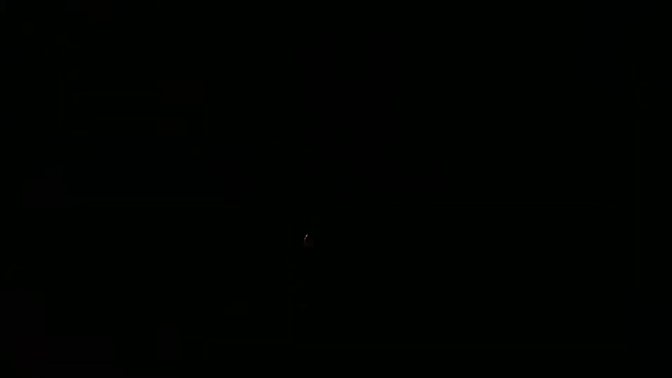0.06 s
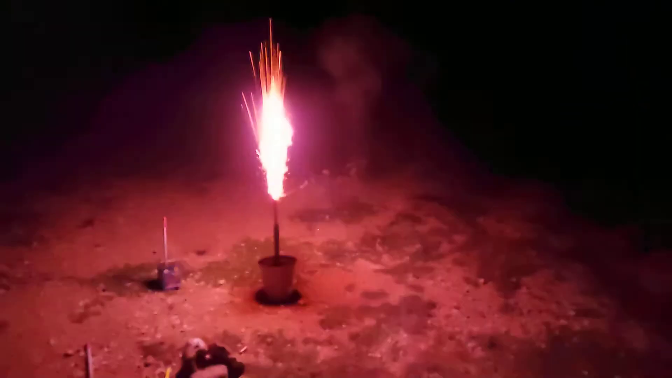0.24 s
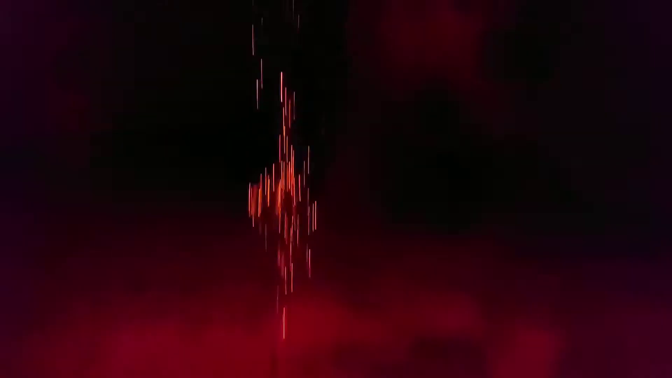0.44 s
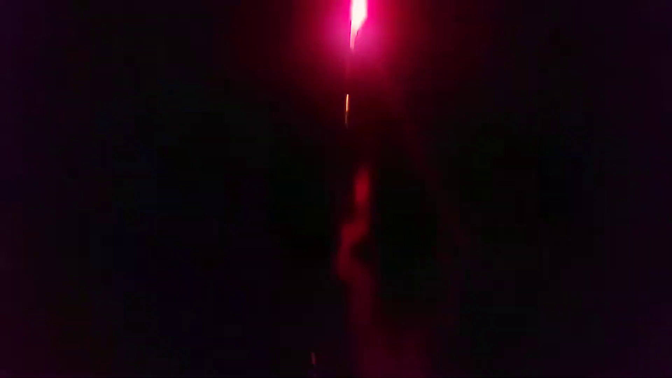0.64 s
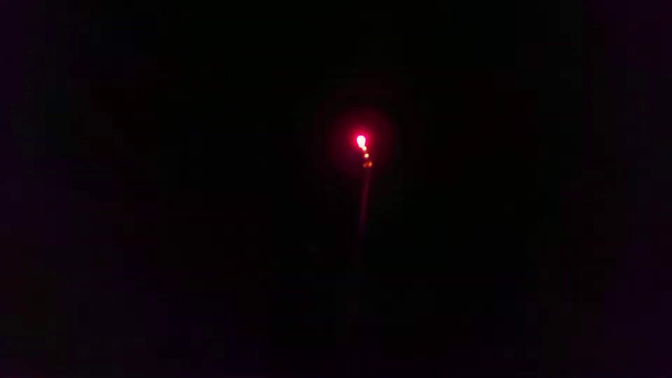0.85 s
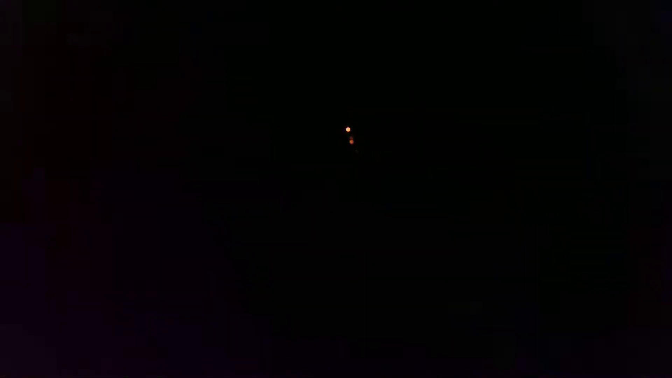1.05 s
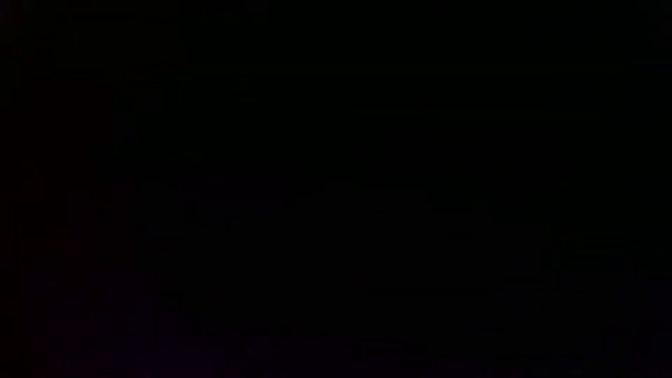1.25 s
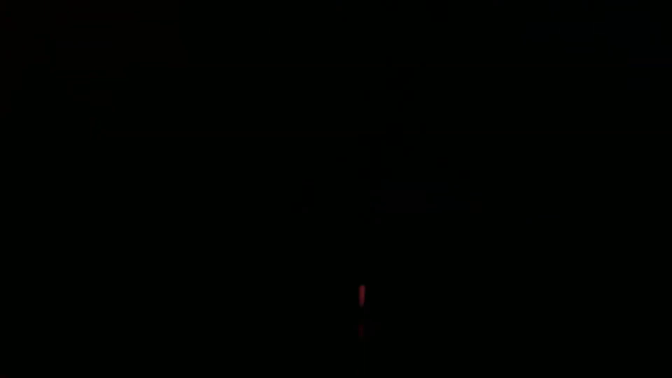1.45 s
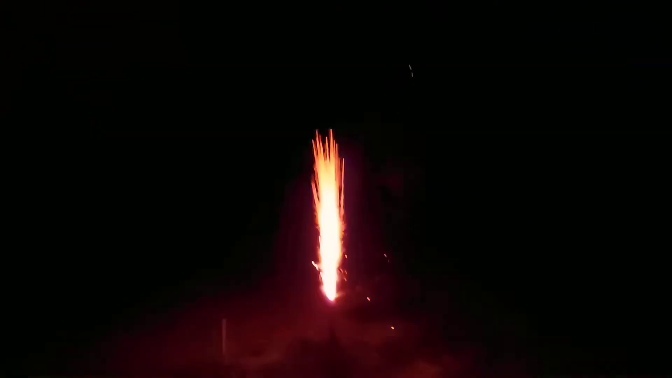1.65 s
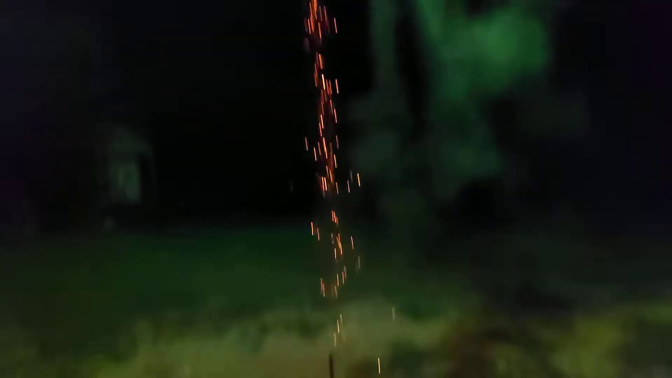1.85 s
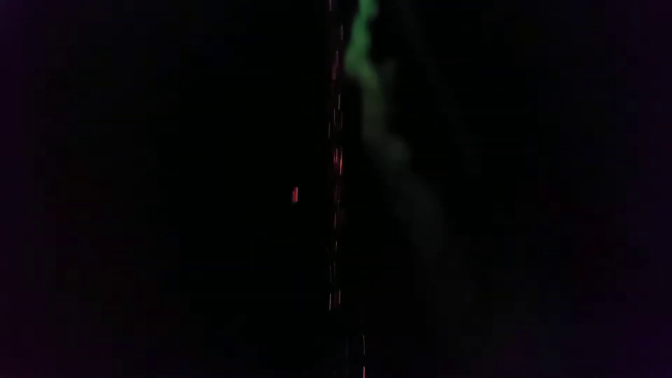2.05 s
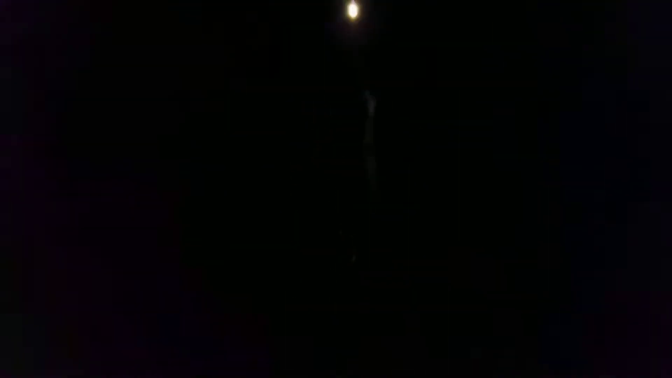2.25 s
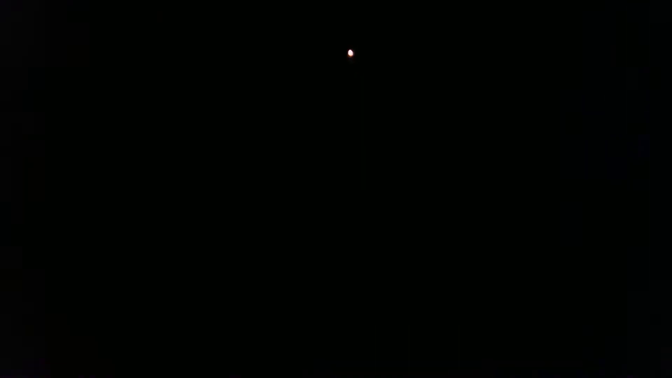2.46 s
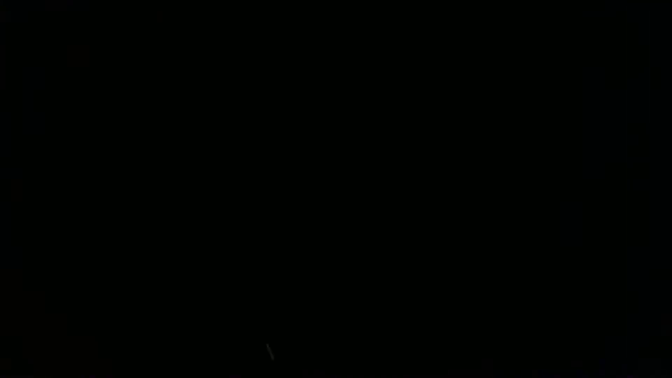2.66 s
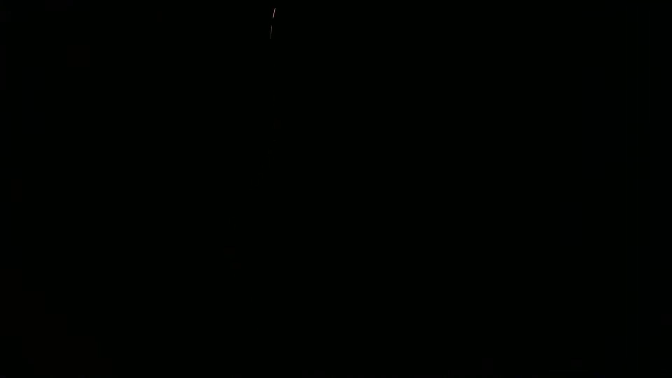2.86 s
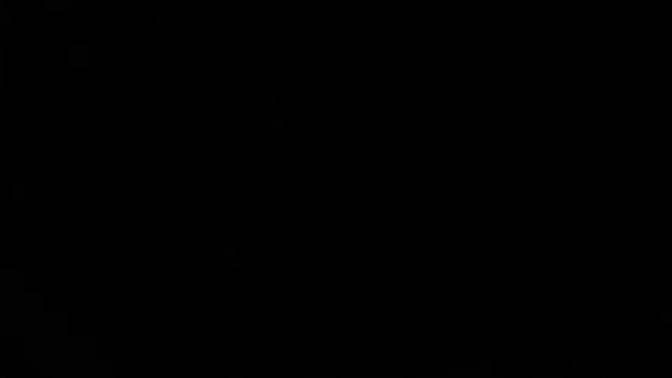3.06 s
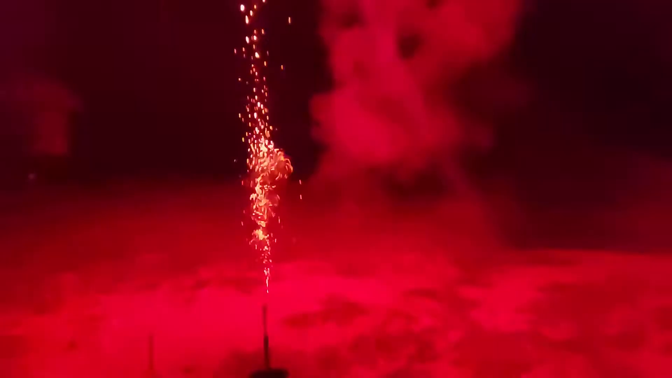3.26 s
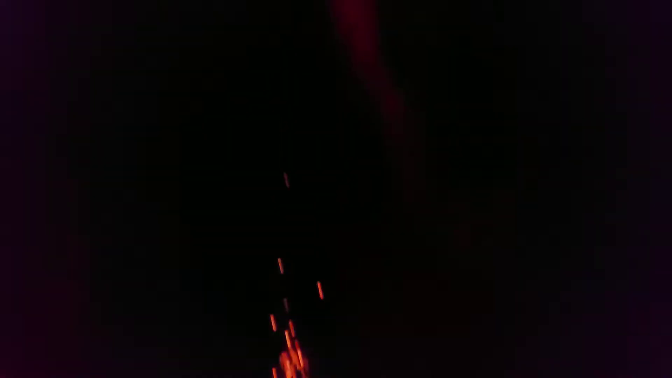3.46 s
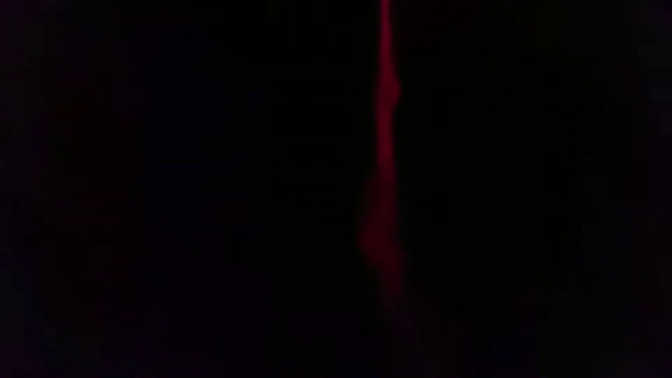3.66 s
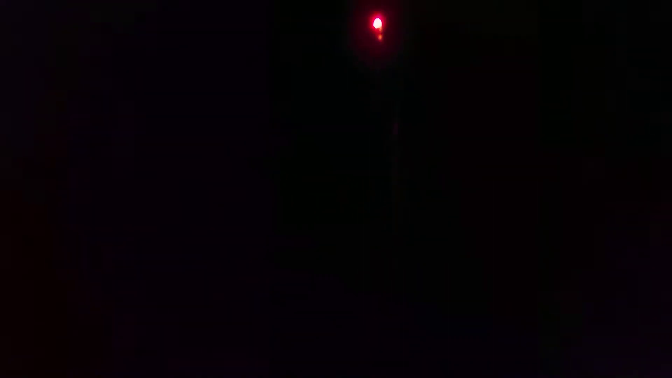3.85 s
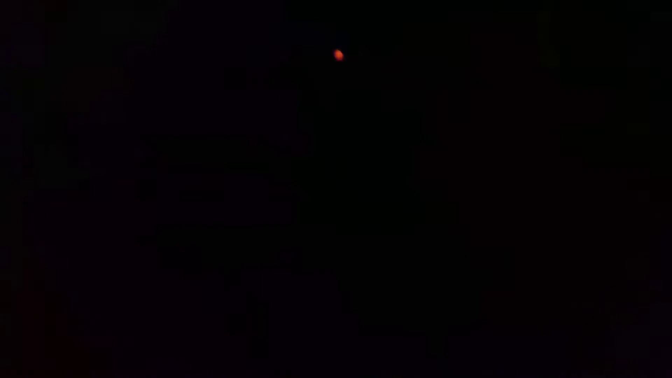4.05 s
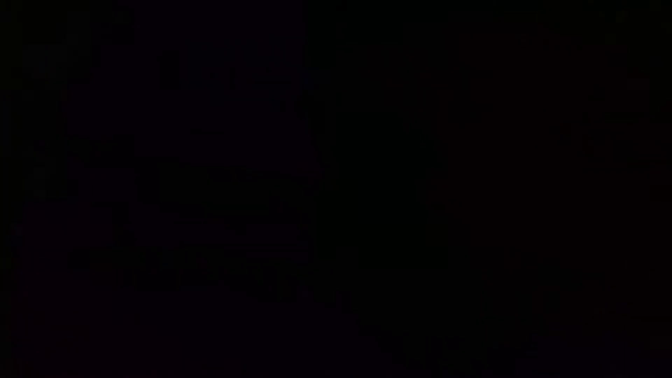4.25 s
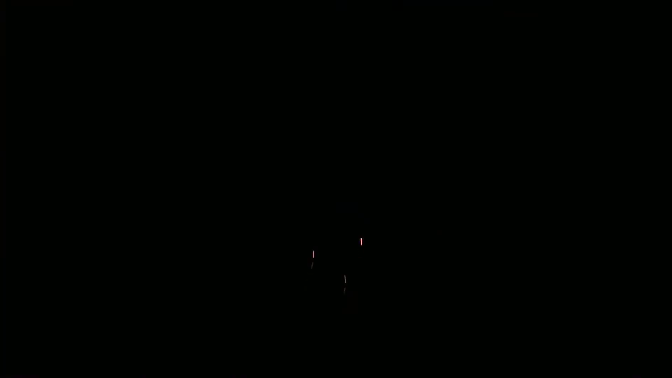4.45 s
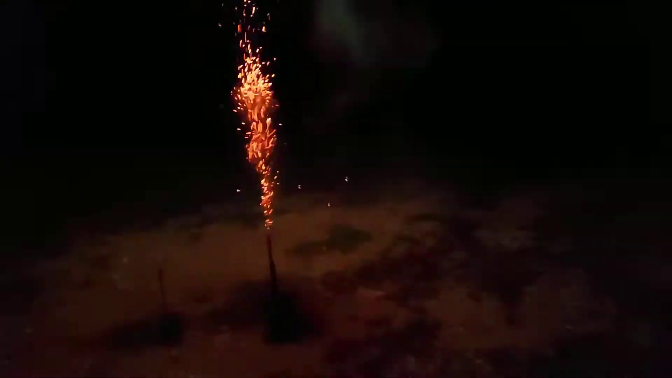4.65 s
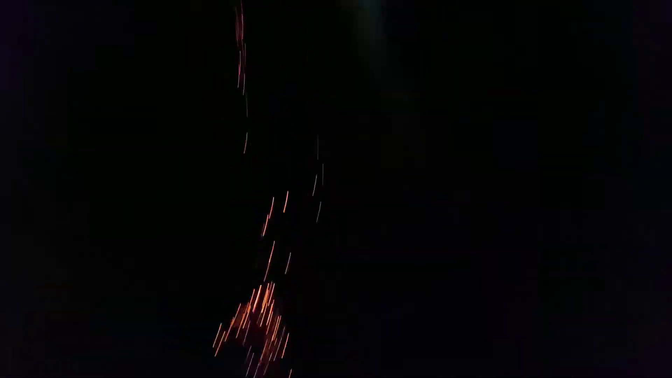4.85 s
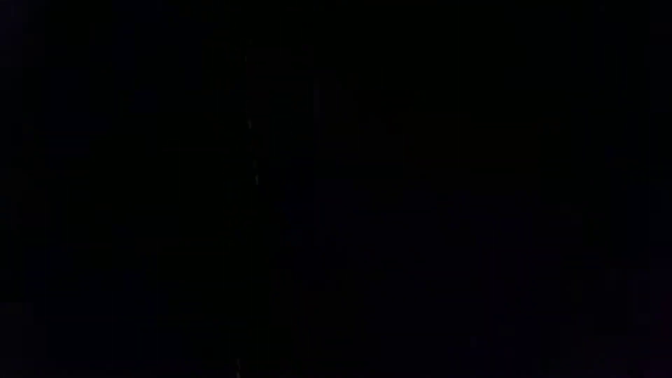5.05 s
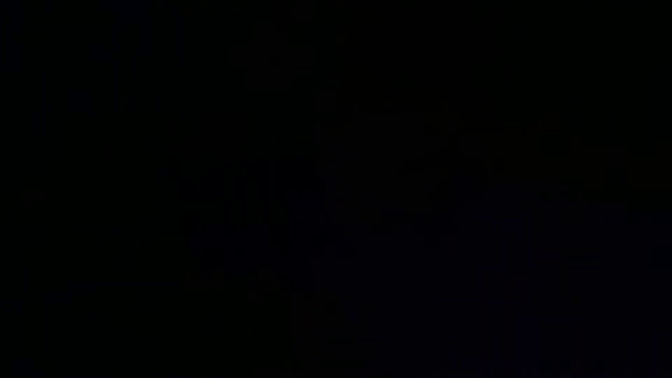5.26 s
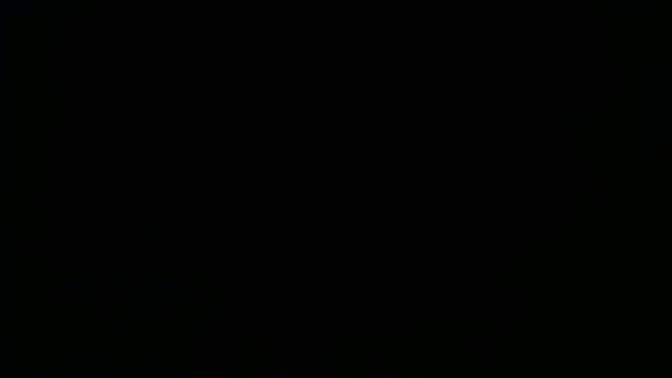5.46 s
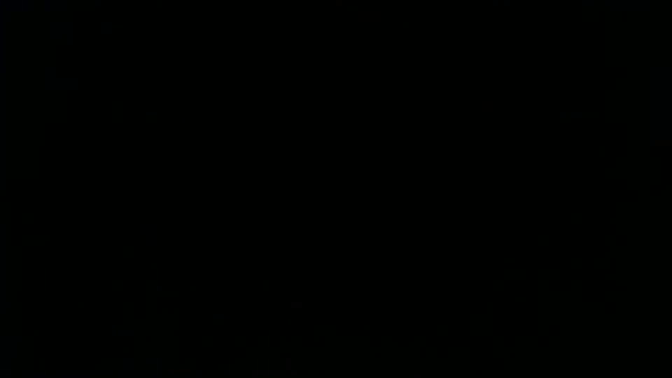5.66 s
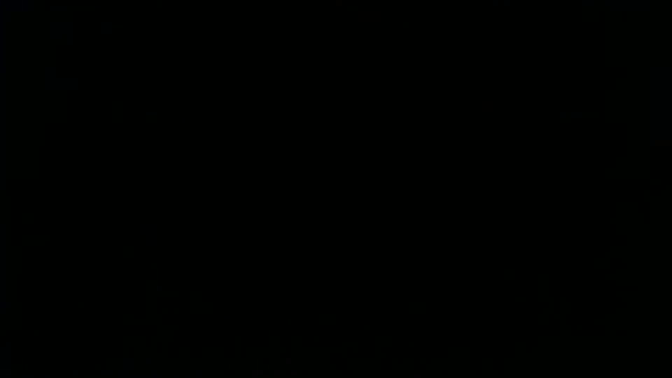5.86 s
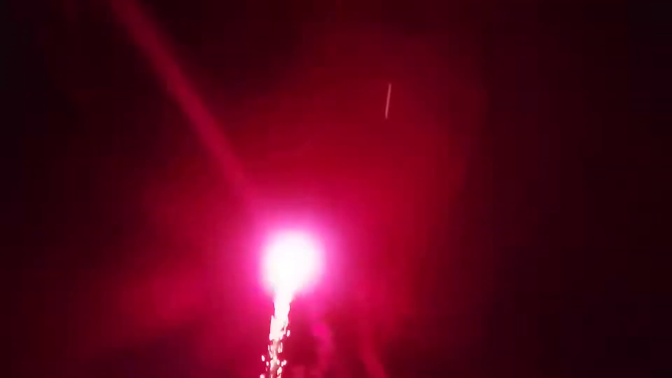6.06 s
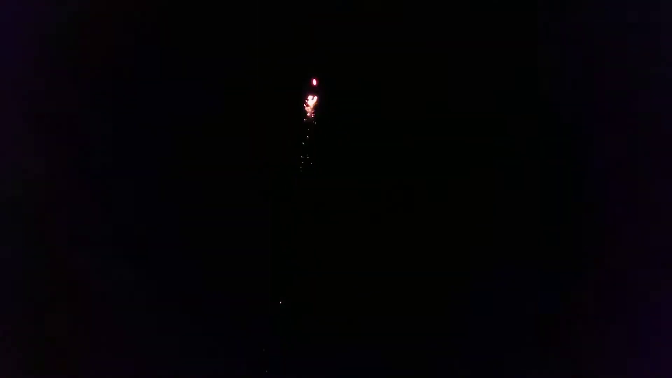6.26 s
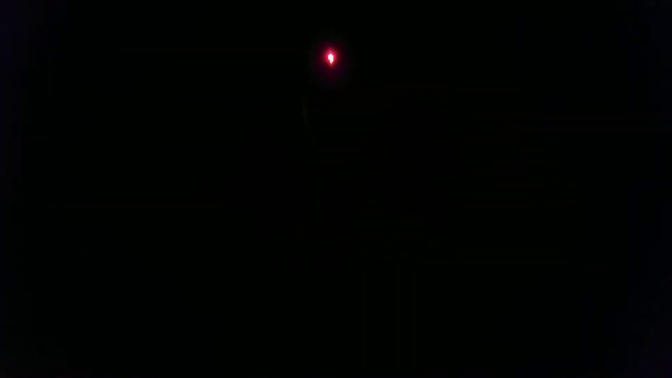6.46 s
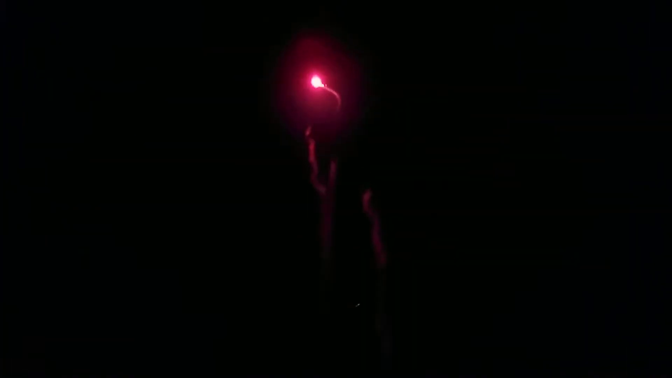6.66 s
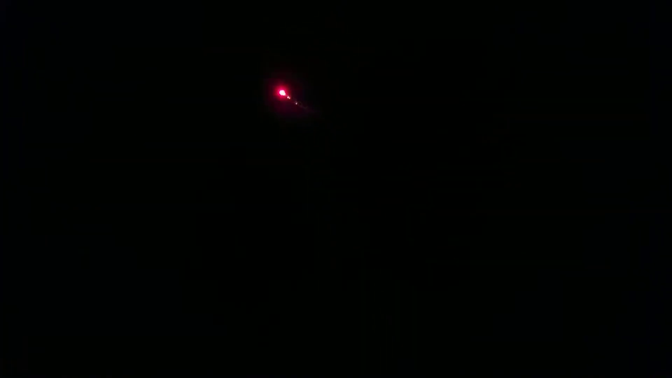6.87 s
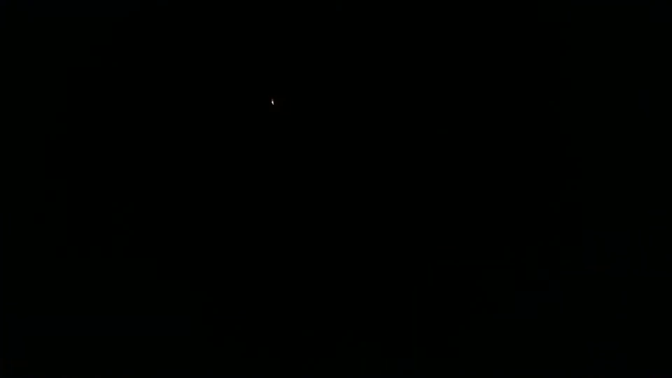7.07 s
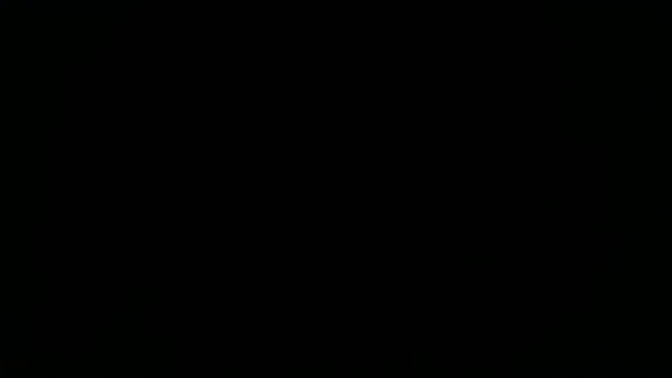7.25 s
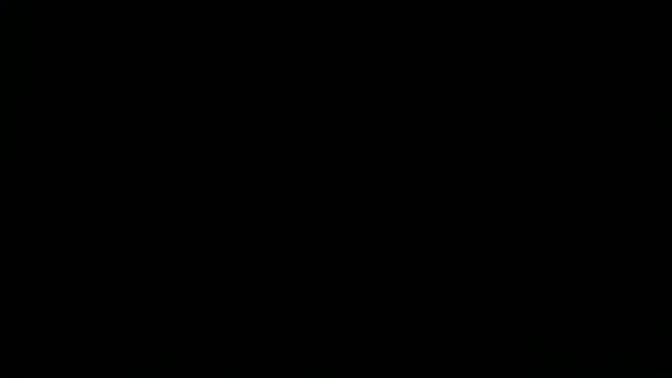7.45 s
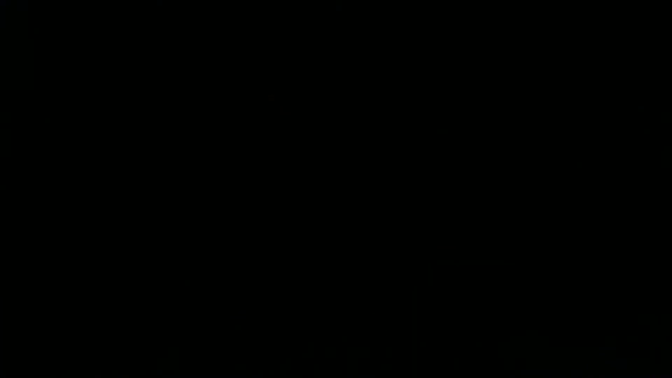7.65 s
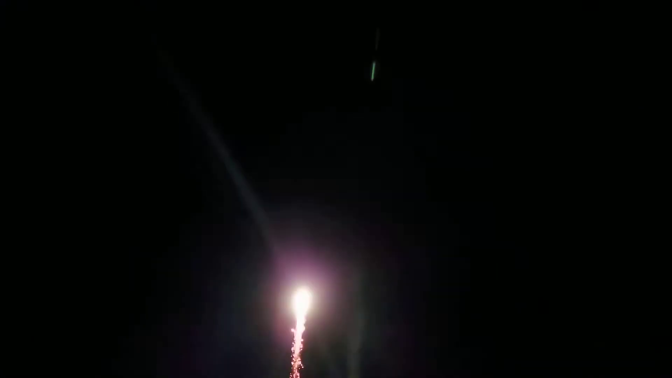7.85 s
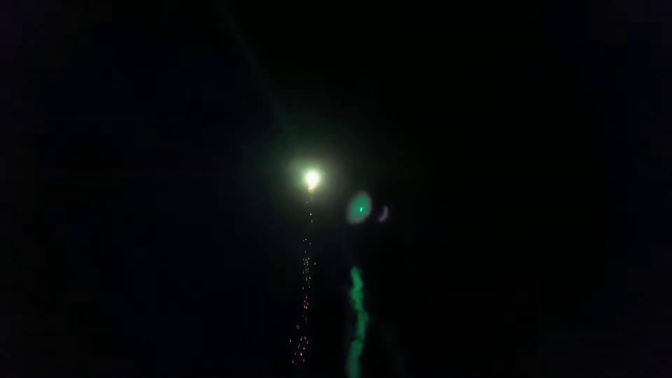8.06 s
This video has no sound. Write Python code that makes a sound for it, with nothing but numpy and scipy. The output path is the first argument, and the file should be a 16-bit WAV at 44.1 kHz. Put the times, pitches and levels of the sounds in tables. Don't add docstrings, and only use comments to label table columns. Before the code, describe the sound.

A quiet night outdoors, heard through a hand-held stereo microphone a few metres from a firework candle. Dense insect trilling around 3 kHz, with a higher shimmer above, runs throughout, swelling gently; a close cricket adds short high phrases. A very faint rising hum precedes the first dull, hollow pop at 0.2 s. Its star hisses away, flaring near 0.55 s. A louder, brighter shot cracks at 1.6, then weaker-jetted ones at 3.1 and 4.5, the latter with a brief rough whirr. Sharp shots follow at 5.9 and 7.7. Each lasts only a few hundredths of a second, followed by a soft half-second tail from trees, a muffled wall echo and a hiss thinning within a second. Low, often one-sided air thumps stand out around 0.5, 1.45, 2.8 and 4.2 s, then become weaker. A distant frog trills barely audibly near 1.3, 4 and 6.6 s. Insects continue to the end at 8.1 s.

```python
import sys
import numpy as np
from scipy import signal
from scipy.fft import rfft, irfft, next_fast_len
from scipy.io import wavfile
from scipy.ndimage import uniform_filter1d

SR = 44100
rng = np.random.default_rng(int(sys.argv[2]) if len(sys.argv) > 2 else 0)


def wav_out(sig):
    wavfile.write(sys.argv[1], SR, np.round(np.clip(np.atleast_2d(sig).T, -1, 1) * 32767).astype(np.int16))


def boost(x):
    u = np.asarray(x, float) / 20
    return 10 ** u


N = 357651

# t/s, delay until the star leaves the mouth/ms
FIRING = [
    (.181, 4.8),
    (1.5998, 5.5),
    (3.1323, 5.1),
    (4.5137, 5.5),
    (5.9229, 5.3),
    (7.6647, 6.8),
]


def candle():
    # jet level/dB, tube ring level/dB, jet brightness/dB, push level/dB, crack level/dB
    shots = [
        (1.5, -13, -26, -20, -16.5),
        (4.5, -14.5, -15, -18, -2),
        (-2.5, -23.5, -26, -20, -9.5),
        (-2, -22, -19.5, -18, -9),
        (0, -18, -23, -17.5, -1.5),
        (1.5, -26.5, -20.5, -16.5, -2.5),
    ]
    trees_db = [-30.5, -31, -31, -29.5, -29, -29.5]
    sizzle_db = [6.5, 1.5, 16.5, 3, 4, -4]
    # f/Hz, level/dB per Hz
    hiss_spectrum = [(500, -34.5), (1000, -5.5), (2000, -8), (4000, -1), (7000, -1), (10000, -6.5),
                     (12500, -1), (16000, -8.5)]
    out = np.zeros((2, N))
    for (start, exit_ms), shot, tail_db, bright_top_db in zip(FIRING, shots, trees_db, sizzle_db):
        add(out, blast(exit_ms, *shot, bright_top_db), start - .012)
        add(out, trees(tail_db), start)
    hiss = diffuse(hiss_spectrum, [(100, .2), (15000, 0)], N)
    return out + star_level() * boost(8.5 + 0.74 * drift(40)) * hiss


def blast(exit_ms, jet_db, tube_db, bright_db, push_db, crack_db, sizzle_db):
    # t/ms after ignition, width/ms, pressure share
    pulses = [
        (0, .5, .9),
        (2.2, 1.1, -1.1),
        (10.6, 1.0, .9),
        (12.5, 2.4, .45),
        (17.5, 1.6, -.25),
    ]
    # f/Hz, level/dB per Hz
    jet_spectrum = [(120, -40.5), (200, -7.5), (541, -4), (811, -12.5), (1460, -8), (1930, -11.5),
                    (2940, -8), (4410, -12.5), (8400, -19), (10100, -22), (13600, -21.5), (15400, -27.5),
                    (16300, -38)]
    # f/Hz, level/dB, decay time T60/s
    modes = [
        (565, 0, .017),
        (1040, -8, .012),
        (1600, -10, .01),
    ]
    wall_s, wall_db, wall_cut_hz = .147, -20.5, 270
    port_lag_s = 4e-5
    ms = np.arange(SR // 4) / SR * 1000 - 12
    push = sum(share * np.exp(-.5 * ((ms - at) / width) ** 2) for at, width, share in pulses)

    shape_ms = [-12, -9, -3, -1.2, -.2, exit_ms + 2, exit_ms + 6, exit_ms + 20, 250]
    shape = boost(np.interp(ms, shape_ms, [-60, -30, -24, -14, 0, -1, -13, -28, -300]))
    ragged = boost(2.5 * 3.9 * uniform_filter1d(rng.standard_normal(len(ms)), size=16))
    tilt = []
    for hz, db in jet_spectrum:
        db = db + (bright_db + 23.0) * np.clip(np.log2(hz / 3000) / 2, 0, 1)
        db = db + sizzle_db * (hz > 11000) + (tube_db - jet_db + 20.0) * (hz < 900)
        tilt.append((hz, db))
    turbulence = colour(ragged * rng.standard_normal((2, len(ms))), tilt)
    jet, stray = boost(jet_db - 14) * shape * turbulence

    # t/ms, crack share, ring share
    cracks = [(0, .35, -.2), (exit_ms, .95, .7), (exit_ms + 1.9, .85, .6)]
    crack = sum(share * np.exp(-.5 * ((ms - at) / .07) ** 2) for at, share, _ in cracks)
    kick = sum(share * (np.arange(len(ms)) == round((at + 11.6) * SR / 1000)) for at, _, share in cracks)
    tube = sum(boost(tube_db + 4.5 + db) * ring(kick, hz, t60) for hz, db, t60 in modes)
    direct = boost(push_db) * push + jet + tube + boost(crack_db) * crack

    dull = signal.sosfilt(signal.butter(3, wall_cut_hz, fs=SR, output="sos"), direct - 0.95 * tube)
    mono = direct + boost(wall_db) * np.interp(ms - 1000 * wall_s, ms, dull, left=0)

    hz = np.arange(len(ms) // 2 + 1) * SR / len(ms)
    shaded = np.exp(-2j * np.pi * hz * port_lag_s) * boost(-5 * (hz / 12000) ** 2)
    scatter = signal.sosfilt(signal.butter(2, 7000, "high", fs=SR, output="sos"), stray)
    return np.array([mono, irfft(rfft(mono) * shaded, len(ms))]) + .5 * scatter


def trees(tail_db):
    # f/Hz, level/dB per Hz
    tail_spectrum = [(24, -48), (40, -14), (130, -10), (646, -9.5), (965, -12), (1630, -11), (3220, -15.5),
                     (3470, -14.5), (11800, -13), (16000, -19)]
    # f/Hz, T60/s
    decay = [(60, 0.4), (300, 0.53), (1000, 0.43), (3000, 0.54), (8000, 0.3502), (15000, 0.49)]
    # f/Hz, left-right likeness
    likeness = [(60, 0.91), (180, 0.68), (550, 0.66), (1650, -0.15), (4970, 0.042), (15000, -0.6)]
    t, hz = np.arange(SR) / SR, np.arange(SR // 2 + 1) + 1.
    noise = rfft(diffuse(tail_spectrum, likeness, SR))
    out, centres = 0, np.geomspace(30, 18000, 10)
    for centre, only in zip(centres, np.eye(len(centres))):
        band = irfft(noise * at_hz(np.transpose([centres, only]), hz), SR)
        t60 = at_hz(decay, centre)
        swell = (0.09 + t / 0.068) ** 1.275 * boost(-60 * t / t60 * 1.417)
        swell = swell + boost(-13.0 - 60 * t / (1.3 * t60))
        out = out + band * swell * boost(2.4 * drift(25)[:SR])
    return boost(tail_db) * out * np.minimum(t / 0.0043, 1)


def star_level():
    # hiss level/dB at ignition, fade/dB per s, burning time/s
    stars = [
        (-65.5, 16.5, 0.77),
        (-66, 13, 0.78),
        (-61.5, 31.5, 0.836),
        (-67.5, 26.5, 0.71),
        (-61.5, 38, 0.59),
        (-69, 24, 0.64),
    ]
    # t/s, level/dB, half length/s
    flares = [
        (0.552, -64, 0.061),
        (2.752, -83.5, 0.17),
        (4.3, -82, 0.12),
        (6.192, -65.5, .03),
        (6.738, -78.5, 0.14),
        (7.402, -86, 0.0069),
    ]
    burn_out_db_per_s, ember_db = 101, -90
    t, power = np.arange(N) / SR, boost(2 * ember_db)
    for (start, _), (db, fade, burns) in zip(FIRING, stars):
        age = t - start
        level = db - fade * age - burn_out_db_per_s * np.maximum(age - burns, 0)
        power = power + (age > 0) * boost(2 * level)
    return np.sqrt(power + sum(boost(2 * db) * np.exp(-((t - s) / half) ** 2) for s, db, half in flares))


def sputter():
    # t/s, f/Hz, level/dB, half length/s
    whirrs = [
        (4.617, 2200, -44, 0.018),
    ]
    t = np.arange(N) / SR
    noise = rng.standard_normal((2, N))
    out = 0
    for s, hz, db, half in whirrs:
        whirr = rms_one(ring(ring(noise, hz, 0.0048), hz, 0.0048))
        out = out + boost(db) * np.exp(-.5 * ((t - s) / half) ** 2) * whirr
    return out


def hum():
    # t/s, f/Hz, level/dB
    tone = [
        (0, 240, -65.5),
        (.07, 288.2, -73),
        (.15, 340, -75.5),
        (.17, 349.8, -73),
    ]
    hz, db = in_time(tone)
    after = np.arange(N) > tone[-1][0] * SR
    return boost(db + 9.5 - 100 * after) * np.sin(2 * np.pi * np.cumsum(hz) / SR)


def insects():
    # f/Hz, spread/Hz, pulse rate/Hz, noise share 0-1, left-right likeness, level/dB
    choirs = [
        (2858, 95, 71, 0.5, -0.2, 1.0),
        (3478, 120, 67, 0.2, -0.21, 2.5),
        (6350, 180, 70, 1, 0.071, 1.5),
    ]
    soloist = (6510, 49, 35, 0.2, .2, .12)
    choir_db = [-56.5, -56.5, -63.5]
    # t/s, level/dB
    eagerness = [(0, 2), (.4, 1), (1, -1), (1.5, 1.5), (2.3, -1.5), (3, 2.5), (3.7, -2.5), (4.4, 0.7),
                 (5.2, -4), (6, -2), (7, -2), (8.11, 1.4)]
    # t/s, length/s, level/dB
    phrases = [(.05, .1, -63.5), (.5, 0.17, -64), (.82, 0.14, -59), (1.0, 0.069, -65), (1.155, 0.2, -62),
               (1.49, 0.085, -61), (1.9, 0.16, -62.5), (2.25, .15, -60), (2.61, 0.27, -69.5),
               (2.92, 0.33, -64.5), (3.48, 0.22, -66.5), (3.86, 0.11, -66.5), (3.965, 0.091, -61.5),
               (4.17, 0.24, -67), (4.9, .16, -64.5), (5.17, .19, -64), (5.5, .2, -66), (5.81, 0.094, -60.5),
               (6.185, 0.17, -64.5), (6.36, 0.098, -72), (6.6, .17, -61), (6.85, 0.28, -74),
               (7.13, 0.11, -64.5), (7.24, 0.31, -61.5), (7.93, .2, -61)]
    rise_s, fall_s, between_db = 0.016, 0.013, -82
    wander_db, answer_db = 0.54, 1.5
    swell_db, = in_time(eagerness)
    singing, phrase = 0, boost(between_db)
    for s, length, db in phrases:
        gate = held(s, length, rise_s, fall_s)
        singing = singing + gate
        phrase = phrase + boost(db) * gate
    low, middle, high = (boost(db + swell_db + wander_db * drift(4.2)) * choir(*kind, count=5)
                         for db, kind in zip(choir_db, choirs))
    answer = boost(answer_db * (2 * uniform_filter1d(singing, size=3000) - 1))
    return low + middle + answer * high + phrase * choir(*soloist, count=1)


def choir(hz, spread_hz, per_s, noisy, alike, trim_db, count=6):
    near = 0
    for detune, tempo, start, turn in rng.standard_normal((count, 4)):
        beat = 2 * np.pi * np.cumsum(per_s * (1 + .12 * tempo + 0.016 * drift(3))) / SR + 9 * start
        phase = 2 * np.pi * np.cumsum(hz + spread_hz * (.7 * detune + 0.36 * drift(9.7))) / SR
        apart = np.arccos(np.clip(alike, -1, 1)) * np.sign(turn) + 0.16 * turn
        pulse = np.maximum(np.sin(beat) + 0.1, 0) * boost(1.3 * drift(3.6))
        near = near + pulse * np.sin([phase, phase + apart])
    far = diffuse([(100, 0), (20000, 0)], [(100, alike), (20000, alike)], N)
    for t60 in np.array([.9, 1, 1.1]) / spread_hz:
        far = ring(far, hz, t60)
    noisy = np.clip(noisy, 0, 1)
    return boost(trim_db) * (np.sqrt(1 - noisy) * rms_one(near) + np.sqrt(noisy) * rms_one(far))


def frog():
    # t/s, length/s, f/Hz, level/dB
    croaks = [
        (1.3, .3, 1344, -77.5),
        (3.99, 0.35, 1280, -82),
        (6.6, 0.28, 1270, -82.5),
    ]
    pulses_per_s, duty = 52.2, .6
    sweep, blur_share, t60_s = .1, .55, .008
    upper_hz, upper_db = 2365, 3
    cycle = (pulses_per_s * np.arange(N) / SR + .03 * drift(8)) % 1
    within = np.clip(cycle / duty, 0, 1)
    pulse = np.sin(np.pi * within) * boost(1.4 * drift(30))
    glide = 2 * np.pi * np.cumsum(1 + sweep * (2 * within - 1) * (within < 1)) / SR
    leaves = rng.standard_normal((2, N))

    def band(hz):
        blur = rms_one(ring(ring(leaves, hz, t60_s), hz, t60_s))
        return pulse * np.sin(hz * glide + [[0], [1]]) + blur_share * blur * (pulse + .5)

    upper = boost(upper_db) * band(upper_hz)
    return sum(boost(db + 5.5) * held(s, length, 0.082, .07) * (upper + band(hz)) for s, length, hz, db in croaks)


def wind():
    # t/s, peak level/dB, left-right difference/dB, half length/s
    gusts = [(0.141, -54.5, -5, 0.031), (0.288, -44, 2, 0.09), (.435, -38.5, -1, .06),
             (0.513, -32, -21, 0.027), (0.567, -39, -21.5, .04), (0.712, -52.5, 0, 0.044),
             (.9, -50, -1.5, .04), (0.965, -50.5, -2, 0.06), (1.444, -25.5, -16, 0.019),
             (1.536, -45.5, -12, 0.047), (1.88, -57, -12.5, 0.12), (2.691, -53.5, -17.5, 0.037),
             (2.778, -34, -4.5, 0.02), (2.832, -47, -15, 0.085), (3.359, -45.5, -18, 0.037),
             (3.665, -64, -12, .04), (4.18, -42, -11, 0.029), (4.214, -29.5, -19, 0.021),
             (4.271, -39, -1, 0.031), (4.399, -47, -8, 0.11), (4.759, -42.5, -11, 0.035),
             (4.836, -48, -28, 0.019), (4.878, -47.5, -12, 0.038), (5.263, -79, 5, 0.027),
             (5.797, -66, -4, .08), (6.498, -59.5, -5, 0.035), (6.715, -58.5, -4, .05),
             (6.92, -66, -1, 0.078), (7.405, -63, .7, .04), (7.86, -54, -4, 0.044)]
    # t/s, level/dB over its mean
    breeze = [(0, 6), (1.2, 4), (2.3, 4), (3.4, 13), (3.8, -15), (4.9, 10), (5.3, -21.5), (6.2, 12.5),
              (6.4, -5), (7.3, -2), (8.11, 2.5)]
    # f/Hz, level/dB per Hz
    spectrum = [(15, -38), (30, -11), (60, -5.5), (120, -2), (230, -16.5), (400, -34.5), (600, -52.5),
                (1000, -80), (2000, -110)]
    gust_drop_db, breeze_db, wander_db = 12, -75, 3
    edge_hz, edge_db, edge_per_lean = 170, -7, .45
    t = np.arange(N) / SR
    power = boost(2 * (breeze_db + in_time(breeze)[0] + wander_db * drift(7.6)))
    leaning = -3 * power
    for s, db, pan_db, half in gusts:
        gust = boost(2 * (db - gust_drop_db * np.abs(t - s) / half))
        power, leaning = power + gust, leaning + pan_db * gust
    shared, *own = rng.standard_normal((3, N))
    air = colour(1.6 * shared + np.array(own), spectrum)
    air = air / (uniform_filter1d(air ** 2, size=1500) + .05) ** 0.7
    edge = signal.sosfilt(signal.butter(2, edge_hz, "high", fs=SR, output="sos"), air)
    air = air + (boost(edge_db + edge_per_lean * np.abs(leaning / power)) - 1) * edge
    left_share = 1 / (1 + boost(-leaning / power))
    return boost(-0.5) * np.sqrt(power) * 2 * np.array([left_share, 1 - left_share]) * air


def night():
    # f/Hz, level/dB per Hz
    spectrum = [(18, -43), (30, -11), (130, -8), (210, -15.5), (760, -25.5), (2150, -32), (2500, -16),
                (3950, -21.5), (4250, -39.5), (5100, -35), (5700, -17.5), (7000, -27), (7700, -36),
                (8600, -26.5), (10000, -40.5)]
    # f/Hz, left-right likeness
    likeness = [(60, 0.44), (240, 0.85), (950, -0.59), (3770, 0.51), (15000, -0.12)]
    return boost(-69) * diffuse(spectrum, likeness, N)


def rms_one(x):
    return x / np.sqrt(np.mean(x ** 2) + 1e-20)


def in_time(rows):
    s, *columns = np.transpose(np.vstack(rows))
    return [np.interp(np.arange(N) / SR, s, c) for c in columns]


def at_hz(points, hz):
    return np.interp(np.log(hz), np.log(np.array(points)[:, 0]), np.array(points)[:, 1])


def drift(rate):
    r = np.exp(-40 * np.pi * rate / SR)
    slow = signal.lfilter([1], [1, -2 * r, r * r], rng.standard_normal(N // 20 + 4002))[4000:]
    return np.interp(np.arange(N) / 20, np.arange(len(slow)), rms_one(slow))


def ring(x, hz, t60):
    r, w = boost(-60 / (t60 * SR)), 2 * np.pi * hz / SR
    return signal.lfilter([0, np.sin(w)], [1, -2 * r * np.cos(w), r * r], x + 1e-18)


def colour(white, spectrum):
    length = white.shape[-1]
    size = next_fast_len(length)
    hz = np.arange(size // 2 + 1) * SR / size + 1
    return rms_one(irfft(rfft(white, size) * boost(at_hz(spectrum, hz)), size)[..., :length])


def diffuse(spectrum, likeness, length):
    alike = np.clip(np.array(likeness)[:, 1], -.98, .98)
    parts = []
    for sign in (1, -1):
        share = [(hz, 10 * np.log10(1 + sign * c)) for (hz, _), c in zip(likeness, alike)]
        gain = boost(np.mean(at_hz(share, np.geomspace(2e3, 2e4, 30))))
        parts.append(colour(rng.standard_normal(length), share) * gain)
    mid, side = parts
    return colour(np.array([mid + side, mid - side]), spectrum)


def held(s, length, rise, fall):
    t = np.arange(N) / SR - s
    return np.clip(t / rise, 0, 1) * np.exp(-np.maximum(t - length, 0) / fall)


def add(out, x, s):
    i = round(s * SR)
    out[:, i:i + x.shape[1]] += x[:, :N - i]


def scene():
    return candle() + sputter() + hum() + insects() + frog() + wind() + night()


def low_pass(x):
    return signal.sosfilt(signal.butter(12, 16990, fs=SR, output="sos"), x)


def record(dry):
    mic_hz, mic_width_hz, top_hz = 54.4, 42, 16900
    r, w = np.exp(-np.pi * mic_width_hz / SR), 2 * np.pi * mic_hz / SR
    mic = signal.lfilter([1, -2, 1], [1, -2 * r * np.cos(w), r * r], dry)
    rounded = 1.136 * np.tanh(mic / 1.104)
    mix = signal.sosfilt(signal.cheby2(12, 70, top_hz, fs=SR, output="sos"), rounded)
    return low_pass(mix)


dry = scene()
out = record(dry)
wav_out(out)
```